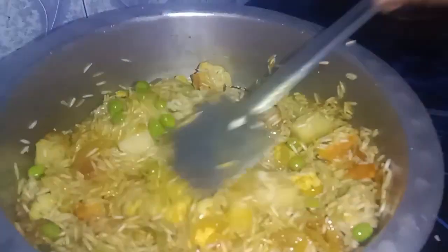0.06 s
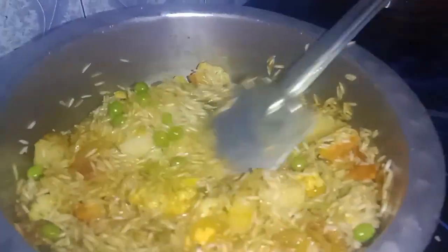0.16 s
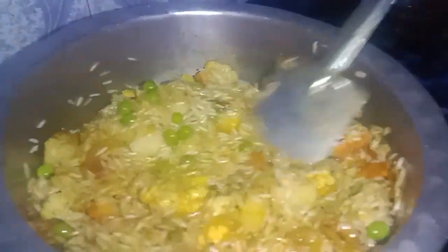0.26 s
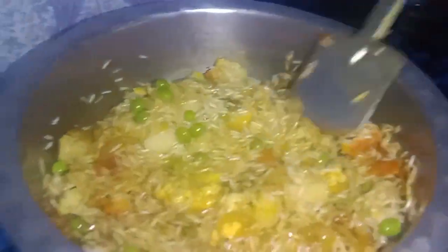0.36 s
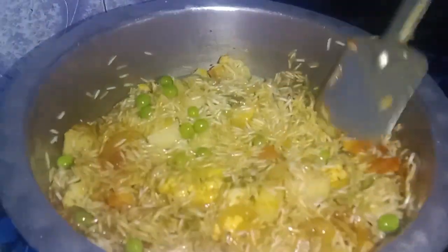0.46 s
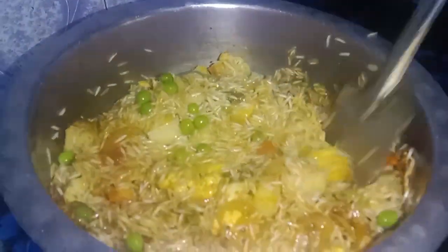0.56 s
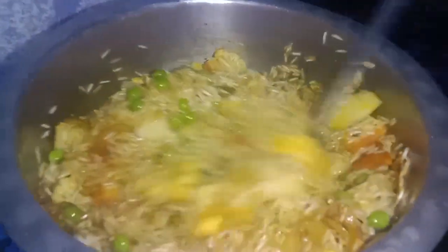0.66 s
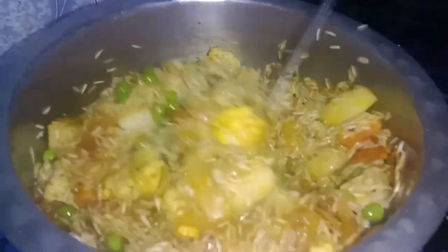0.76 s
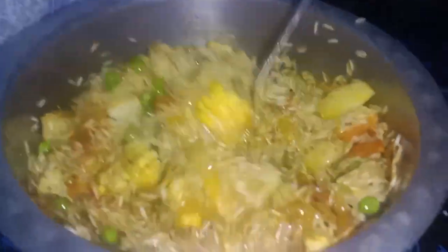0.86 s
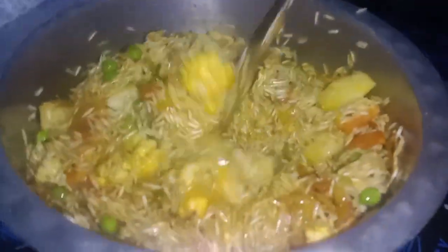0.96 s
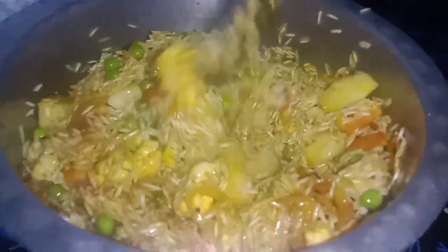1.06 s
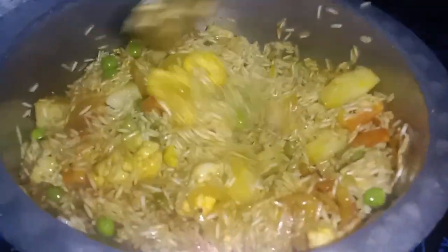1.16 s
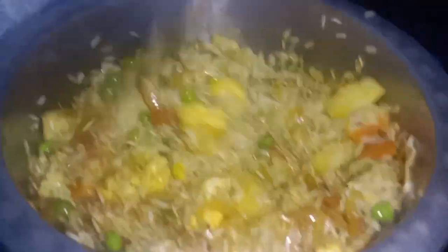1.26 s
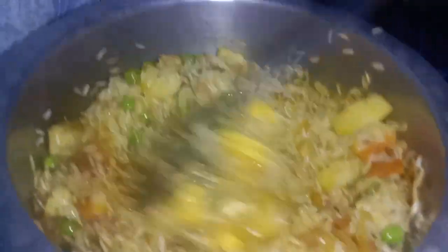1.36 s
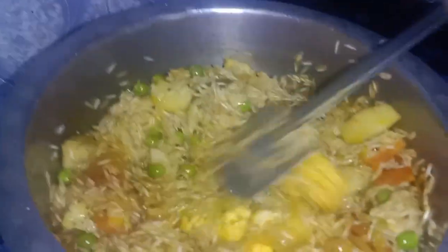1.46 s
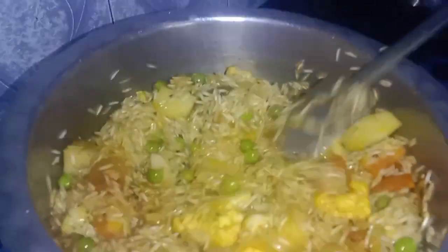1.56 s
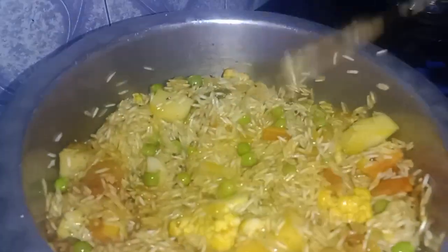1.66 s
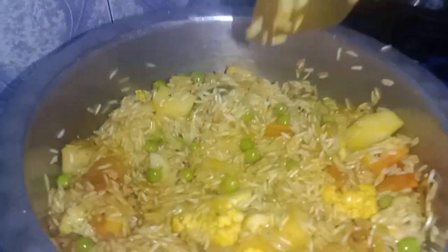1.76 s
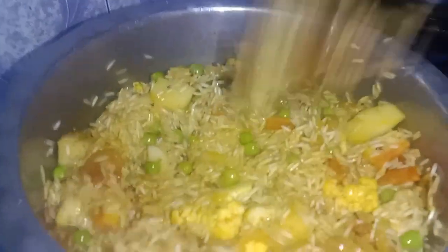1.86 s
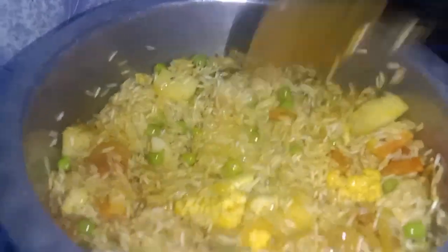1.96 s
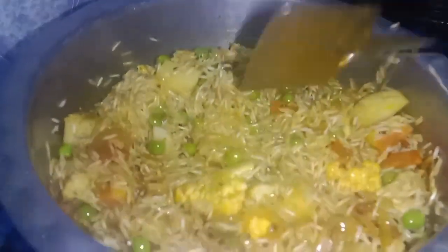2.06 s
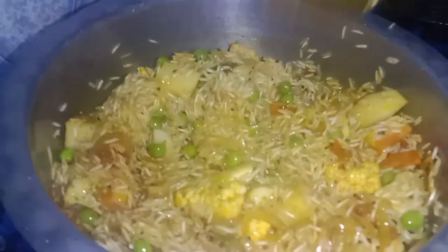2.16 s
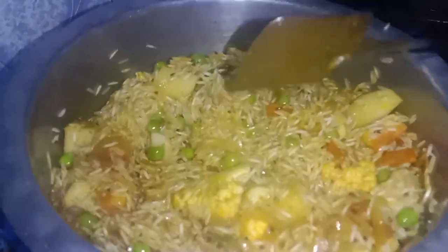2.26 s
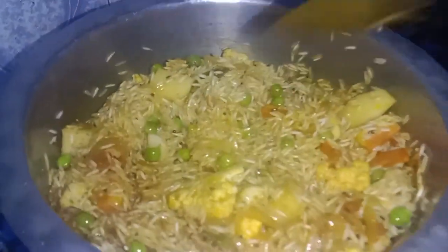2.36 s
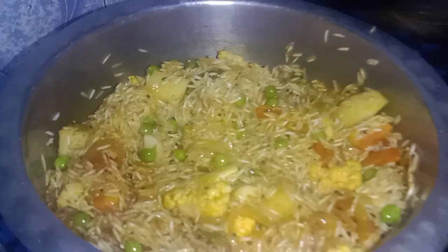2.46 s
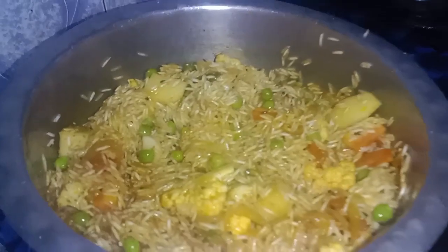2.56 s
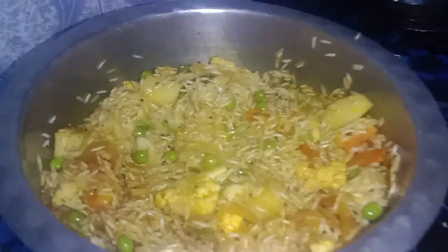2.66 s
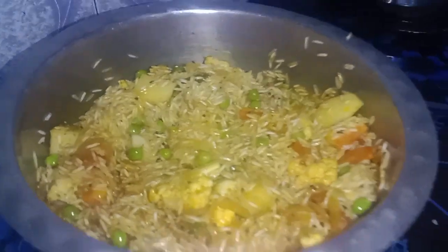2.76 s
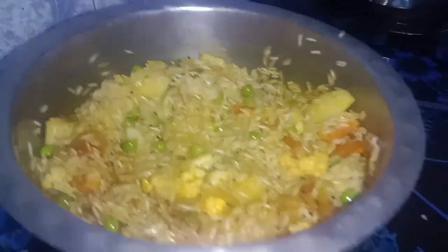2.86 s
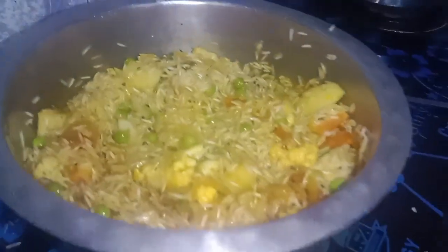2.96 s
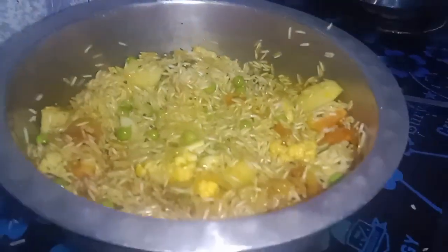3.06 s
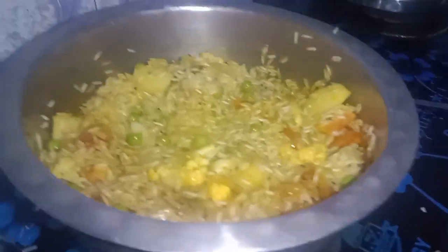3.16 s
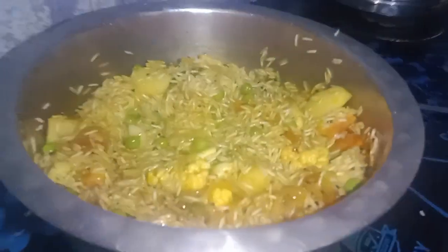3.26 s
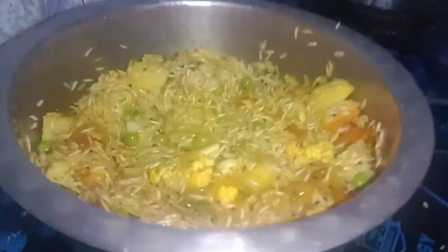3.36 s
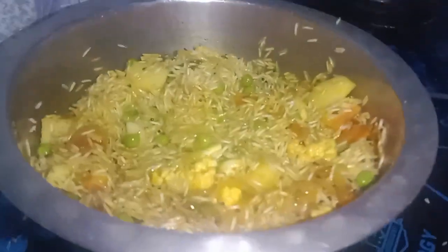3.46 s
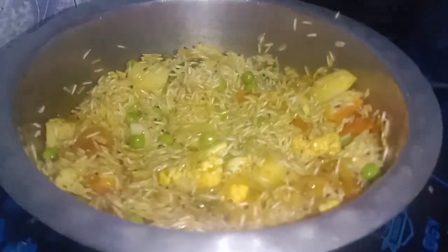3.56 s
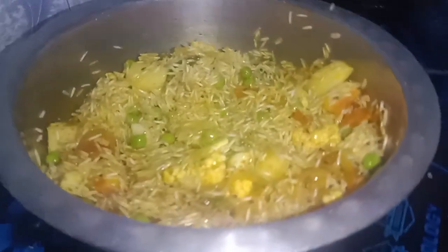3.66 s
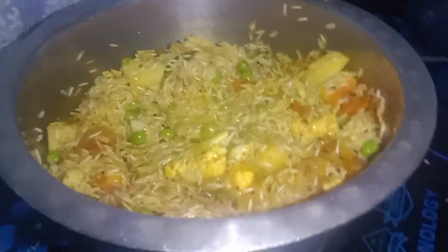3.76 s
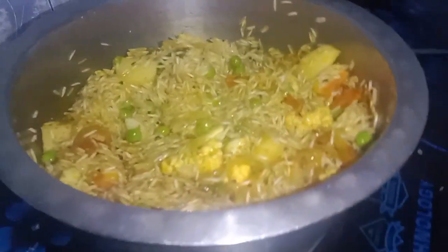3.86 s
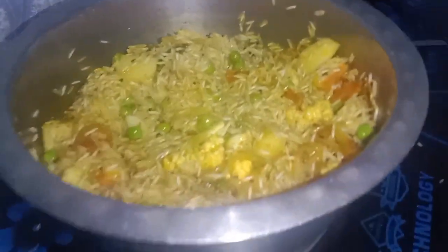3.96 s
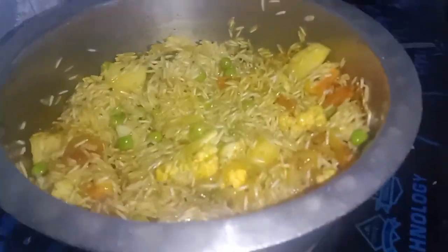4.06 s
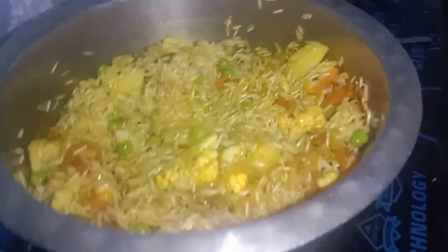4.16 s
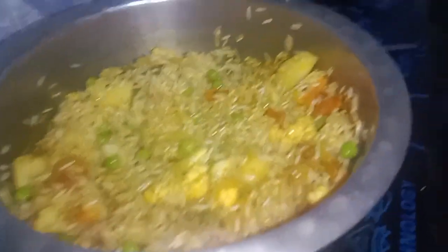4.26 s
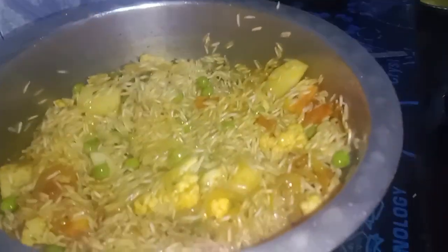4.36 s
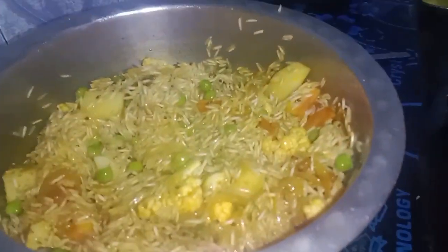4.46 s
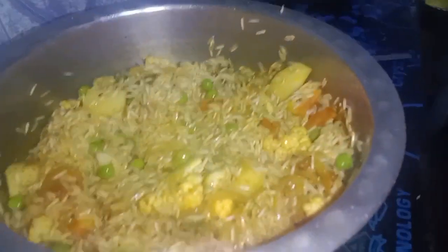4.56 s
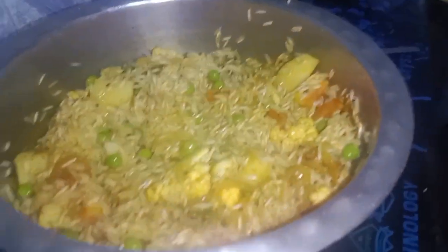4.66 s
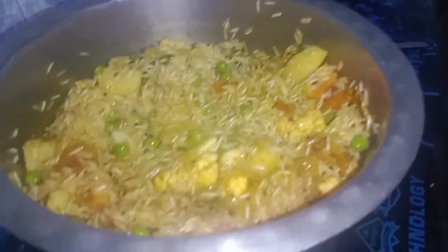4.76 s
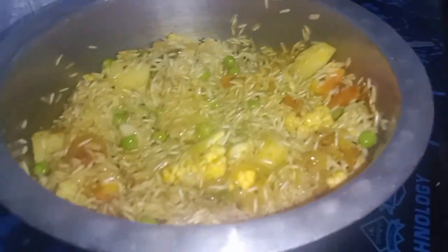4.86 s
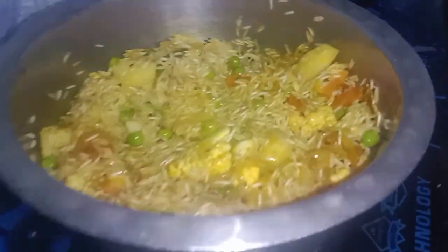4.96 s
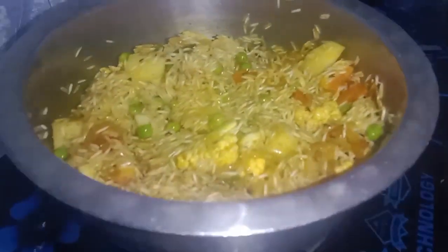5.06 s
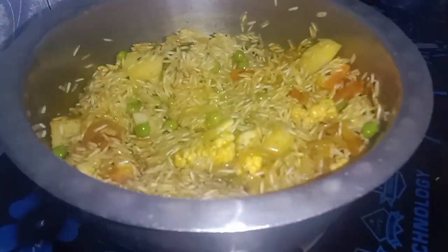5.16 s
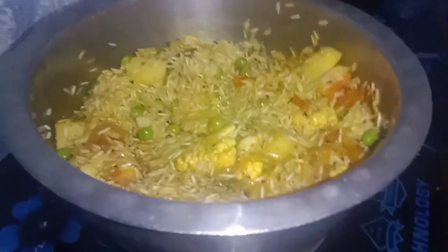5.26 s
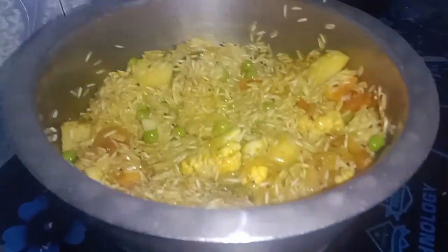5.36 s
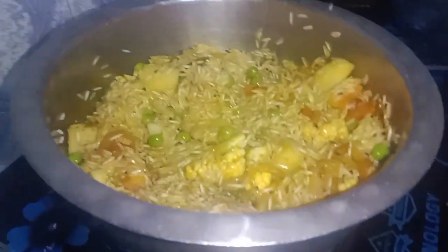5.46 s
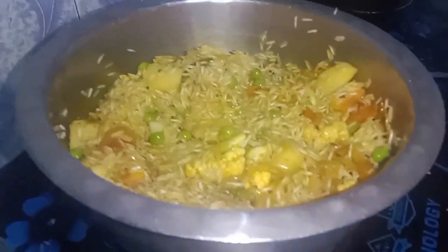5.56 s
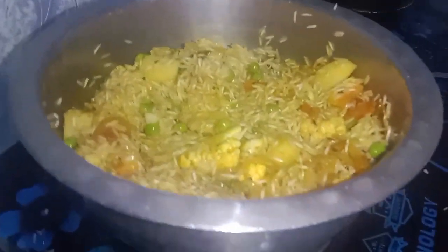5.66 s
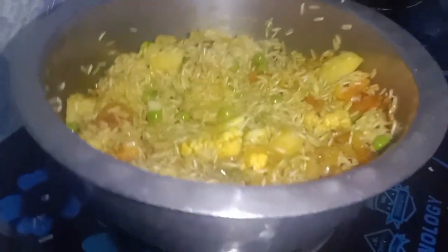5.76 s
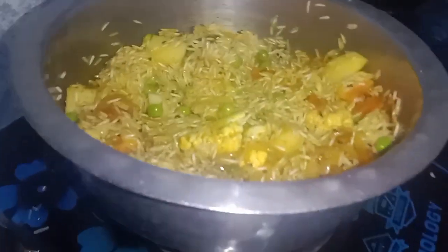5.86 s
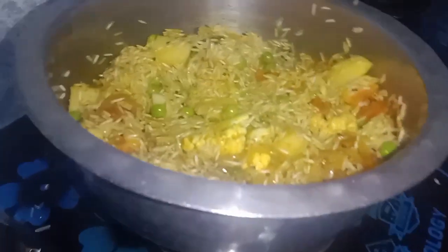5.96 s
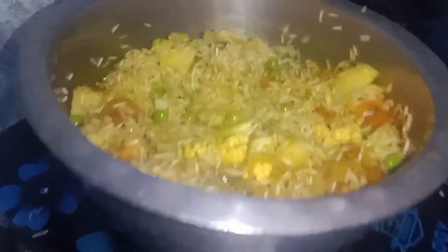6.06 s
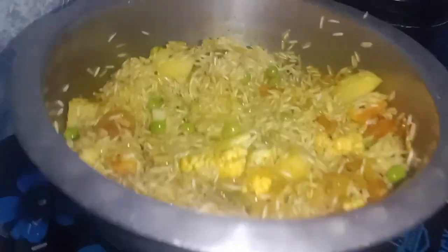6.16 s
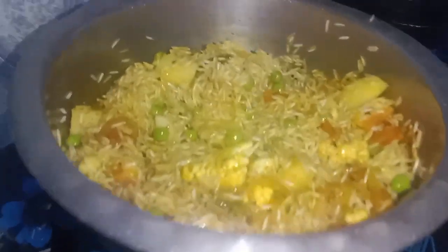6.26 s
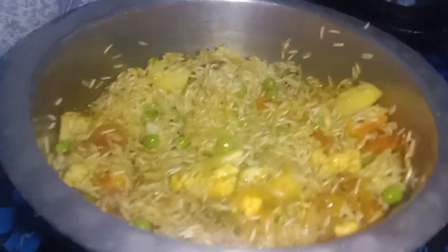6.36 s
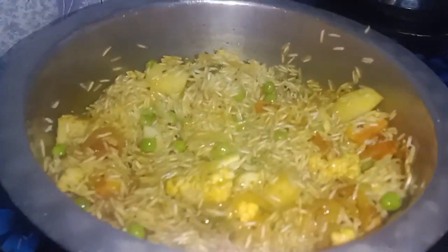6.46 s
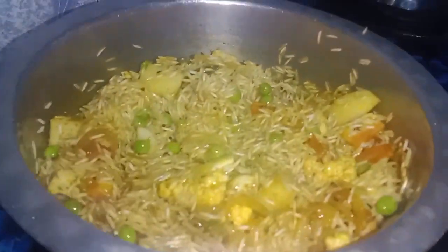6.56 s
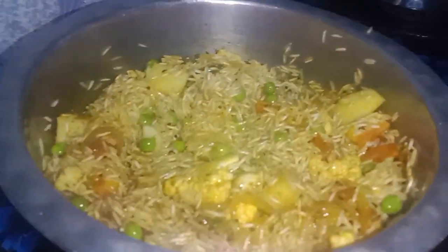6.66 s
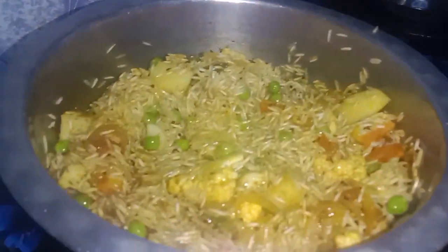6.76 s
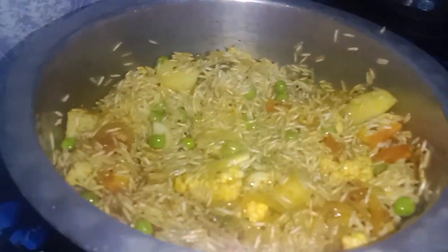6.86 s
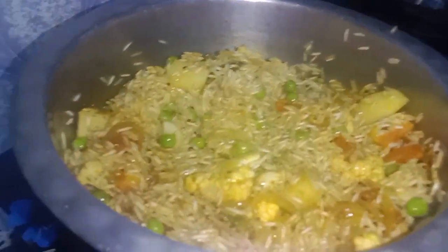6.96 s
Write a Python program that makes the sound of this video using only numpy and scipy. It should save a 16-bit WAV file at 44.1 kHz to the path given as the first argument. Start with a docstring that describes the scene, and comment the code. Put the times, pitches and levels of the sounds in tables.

```python
"""Rice and vegetables fry in a wide steel pot in a kitchen: random grains of noise make the sizzle.
A metal spoon, heard as struck and rubbed modes, turns the rice, hits the wall and squeaks on the steel.
It is knocked clean three times on the rim and put down with a clatter of steel modes and noise bursts.
The sizzle settles, faint narrow-band tones flicker under it, and grains of noise make a thin rustle nearby.
A limiter ducks the sound around the hardest knocks."""
import sys
import numpy as np
from scipy import signal
from scipy.fft import rfft, irfft
from scipy.io import wavfile
from scipy.ndimage import uniform_filter1d, minimum_filter1d

SR = 44100
rng = np.random.default_rng(int(sys.argv[2]) if len(sys.argv) > 2 else 0)


def waveform_to_disk(signal):
    """Save audio, clipped to [-1, 1], as 16-bit WAV at the path in sys.argv[1]."""
    frames = np.transpose(np.atleast_2d(signal))
    scaled = np.clip(frames, -1, 1) * 32767
    samples = np.round(scaled).astype(np.int16)
    wavfile.write(sys.argv[1], SR, samples)


N = 309141
TIME = np.arange(N) / SR   # seconds

# Room noise: hz, relative_db_per_hz
ROOM_COLOUR = [(18, -72.5), (30, -35.5), (60, 0), (247, -9), (413, -11), (679, -19.5), (918, -21),
               (1100, -26), (1430, -70.5), (2420, -120)]
ROOM_DB = -78
# Faint dull tones: middle_s, pitch_hz, level_db, length_s (between the points 1/e of the peak)
DULL_TONES = [(0.097, 507, -58, 0.093), (1.561, 222, -51, 0.042), (1.76, 600, -54, 0.035),
              (1.828, 301, -54.5, 0.17), (2.685, 537, -57.5, 0.075), (3.913, 910, -67, 0.1),
              (4.807, 414, -63.5, 0.11), (5.519, 510, -56.5, 0.051), (5.55, 619, -63, 0.051)]

# Vigour of the frying, sinking after the stir and creeping back as the bottom heats: time_s, level_db
FRYING_TREND = [(0, -33.5), (.72, -35.5), (1.2, -40.5), (2.0, -41), (3.7, -57.5), (5.4, -56), (6.1, -49.5),
                (7.0, -50.5)]
# Wet rice meets hot steel and the sizzle flares up: start_s, rise_db, fade_s (time constant)
FLARES = [(.118, 3.5, 0.26), (.285, 4.5, 0.054), (1.342, 4, 0.047), (1.41, 3, 0.046), (1.636, 5, 0.039),
          (4.295, 2.5, 0.13), (4.57, 2, 0.098), (4.89, 8.5, 0.12), (5.53, 6.5, 0.13)]
FLARE_ATTACK_S = 0.01
# Share of the rice that is freshly turned at the start, and the time constant of its settling
TURNED_SHARE, SETTLE_S = 0.92, 1.8
# Sizzle of freshly turned rice: hz, relative_db_per_hz
TURNED_COLOUR = [(650, -51), (1100, -35.5), (1240, -10.5), (1520, -18.5), (1640, -10.5), (2340, -12.5),
                 (3250, 0.5), (3800, -0.5), (4440, -16.5), (5420, -8), (7300, -3), (8810, -15.5),
                 (9520, -30.5), (15500, -31)]
# Sizzle of resting rice: hz, relative_db_per_hz
RESTING_COLOUR = [(530, -21.5), (900, -22), (1000, -31), (1180, -23.5), (1650, -18.5), (1770, -23.5),
                  (2250, -20.5), (2690, -6.5), (3540, 4), (3890, 2.5), (4390, -26.5), (5120, -6.5),
                  (7680, 2), (9510, -18), (15500, -25.5)]
# Single spits of oil: start_s, relative_db
SPITS = [(0.646, -40), (0.994, -36), (1.069, -19.5), (2.7293, -30.5), (4.304, -34.5), (4.609, -34.5),
         (4.8994, -31.5), (5.5648, -30), (5.5938, -34), (6.725, -30)]
# Faint narrow-band tones flicker under the sizzle, early on at this level relative to it
TONES_EARLY_DB = -19
# Later the tones grow steadily by themselves
TONES_FROM_S, TONES_START_DB, TONES_DB_PER_S = 3.91, -75.5, 3.5
# Pitches of the flickering tones: pitch_hz, relative_db, t60_s
FLICKER_MODES = [(1289, -10, 0.055), (1456, -10.5, 0.13), (1647, -4, 0.087), (1700, -3.5, 0.11),
                 (2240, -9.5, .08), (2658, 3, .08)]

# The spoon pushes through damp rice: start_s, length_s, level_db
PUSHES = [(.035, .18, -52), (.29, .13, -61), (1.595, .08, -59.5)]
PUSH_ATTACK_S, PUSH_T60_S = 0.011, 0.32
# The hollows that squelch in the rice: pitch_hz, relative_db, t60_s
SQUELCH_MODES = [(290, -5, 0.044), (480, -4, 0.17), (602, -0.5, .08), (707, -6, .07), (815, 0, 0.023),
                 (900, 6.5, 0.16), (1073, -9, 0.062), (1196, 10, 0.079)]
# The spoon drags along the bottom in jerks: start_s, length_s, level_db
DRAGS = [(.78, 0.039, -32.5), (.856, .03, -33.5), (.915, 0.037, -44)]
DRAG_ATTACK_S, DRAG_T60_S = 0.0068, 0.14
# The modes that groan under the drag: pitch_hz, relative_db, t60_s
SCRAPE_MODES = [(71.5, -26, .2), (164, -16, .12), (267, -13, 0.085), (275, -1.5, .1), (329, 10.5, 0.13),
                (413, 5.5, 0.073), (559, 1, 0.066), (703, 4.5, 0.053), (804, -3, .05)]

# Spoon on the pot, levels relative within each layer:
# start_s, rim_ring_db, judder_db, judder_length_s, tail_db, tail_t60_s, boom_db
KNOCKS = [(0.645, -32, -59, 0.0034, -61.5, 0.25, -67.5), (0.7784, -22.5, -26, 0.036, -23, 0.49, -58.5),
          (2.0189, 10, -26, 0.097, -23, .6, -32.5), (2.1972, 8.5, -25.5, 0.0895, -27.5, 0.62, -39.5),
          (2.3816, 10, -29, 0.094, -24, 0.64, -33.5)]
# The struck rim, a short clank and a weaker after-ring: pitch_hz, relative_db, t60_s
RIM_MODES = [(3412, -7, 0.033), (3500, -3.5, 0.014), (3773, -5, 0.029), (7000, -4.5, 0.02),
             (7560, 1.5, 0.0075), (3260, -40, 0.18), (3524, -53.5, 0.12), (3840, -42, 0.29),
             (7650, -47, 0.14)]
# Slow modes of the pot's wall and bottom: pitch_hz, relative_db, t60_s
POT_MODES = [(73, -6, 0.29), (119.7, -11.5, 0.26), (165.3, -3.5, 0.33), (229.4, -17, 0.14),
             (295.5, 1, 0.42), (424.7, 2, 0.18), (495, -12.5, .12), (670, -13, .15), (1094, -1, 0.11)]
# Noise of the struck pot wall: hz, relative_db_per_hz
POT_COLOUR = [(120, -60.5), (200, -15), (293, -3), (352, -15.5), (422, -1.5), (462, -7), (641, -5),
              (992, -8.5), (1070, -10), (2470, -9), (3420, 3), (4660, -15.5), (7350, -3.5), (9480, -23.5),
              (15500, -35.5)]
CRACK_DB = -10   # crack of a contact, set relative to the rim's ring
POT_STEADY_S = 2.677   # the pot stops shaking on the hob

# The spoon's edge squeaks on the steel: start_s, relative_db
SQUEAKS = [(1.035, -26.5), (1.05, -42)]
# Partials of the squeak: pitch_hz, relative_db, t60_s
SQUEAK_MODES = [(8380, 6.5, 0.046), (8660, -6, 0.24), (9850, -12, 0.12), (13100, -8, 0.19),
                (13100, -16, .08), (14400, -11, .04), (15400, -13, .05)]

# Spoon put down: start_s, relative_db, treble_db, worktop_thud_db
CLATTER = [(3.0554, -19.5, 0, -49), (3.0614, -22, 9.5, -42), (3.146, -16.5, 0, -58),
           (3.1567, -14, -4.5, -77), (3.1622, -20, 8.5, -47.5), (3.3121, -12, -13.5, -48),
           (3.321, -14.5, -7.5, -36), (3.331, -14, -7, -34), (3.395, -28.5, -1, -47.5),
           (5.4899, -39, 0, -57), (5.503, -42, -2, -47.5)]
# Ring of the spoon: pitch_hz, relative_db, t60_s
SPOON_MODES = [(1357, -24.5, 0.26), (1576, -18.5, 0.22), (2180, -16, 0.22), (2610, -8.5, 0.33),
               (2695, -0.5, 0.14), (2850, -1.5, 0.15), (3430, -9, 0.17), (3394, 6, 0.057),
               (3830, 1.5, 0.122), (5080, -9, 0.26), (6500, -11, 0.38), (6860, -1.5, 0.32), (7450, 0, 0.13),
               (8830, -9.5, 0.097), (8680, 0, 0.12), (9860, -4.5, 0.067)]
# Noise and lesser modes of the spoon: hz, relative_db_per_hz
SPOON_COLOUR = [(710, -78), (1200, -35.5), (2090, -14.5), (2160, -21), (2330, -18.5), (2570, -5), (3390, 1),
                (4770, -20), (5090, -11), (5670, -6.5), (8240, -3), (9270, -21.5), (15500, -24.5)]
# Thud of the worktop: hz, relative_db_per_hz
WORKTOP_COLOUR = [(200, -25), (400, -15), (560, 0.5), (780, -16.5), (920, -10.5), (1300, -12), (2200, 4.5),
                  (3000, -36)]

# Something thin is handled, with a few firmer squeezes: start_s, length_s, relative_db
RUSTLES = [(5.86, 0.79, -48.5), (6.075, 0.071, -46), (6.21, .04, -45), (6.29, 0.12, -43),
           (6.645, 0.05, -42.5)]
RUSTLE_ATTACK_S, RUSTLE_T60_S = 0.031, 0.14
# Sharper crinkles in the rustle: start_s, relative_db, t60_s
CRINKLES = [(5.852, -36.5, 0.095), (5.9, -38.5, 0.093), (5.969, -35, 0.12), (6.221, -43, 0.073),
            (6.549, -30, 0.015), (6.583, -29.5, 0.049)]
# Rustle: hz, relative_db_per_hz
RUSTLE_COLOUR = [(1180, -36), (2000, -44), (2350, -32), (3290, -5), (3800, -8), (4440, -27), (5180, -11.5),
                 (7170, 1), (8660, 1.5), (9430, -9.5), (11500, -14), (12700, -9), (13900, -21), (15500, -5)]

# Top of the band, and how early the limiter acts
CUTOFF_HZ, LOOK_AHEAD_S = 15700, 0.0105


def from_db(db):
    """Logarithmic level: decibels to amplitude gain."""
    return 10 ** (np.asarray(db) / 20)


def rms_one(x):
    """Normalisation: scale to unit rms."""
    return x / np.sqrt(np.mean(x ** 2) + 1e-20)


def in_time(rows):
    """Linear interpolation: join (time_s, value) rows by straight lines."""
    return np.interp(TIME, *np.transpose(rows))


def drift(per_s):
    """Slow random modulation: a wander of rms 1 through per_s random points a second."""
    return rms_one(np.interp(TIME * per_s, np.arange(4000), rng.standard_normal(4000)))


def strokes(rows, attack_s, t60):
    """Envelope of movements (start_s, length_s, level_db): each swells, holds and dies away."""
    gain = np.zeros(N)
    for s, length, db in rows:
        swell = np.clip((TIME - s) / attack_s, 0, 1)
        after_s = np.maximum(TIME - s - length, 0)
        gain += swell * from_db(db - 60 * after_s / t60)
    return gain


def add(track, s, sound):
    """Superposition: mix a sound into a track at time s."""
    start = round(s * SR)
    track[start:start + len(sound)] += sound[:N - start]


def coloured(x, spectrum, size=4096):
    """Minimum-phase (causal) filtering to the given spectrum; white noise keeps its power."""
    hz, db = np.transpose(spectrum)
    bins = np.maximum(np.fft.rfftfreq(size, 1 / SR), 1)
    log_gain = np.log(from_db(np.interp(np.log(bins), np.log(hz), db)))
    # folding the cepstrum onto positive times makes the response causal
    cepstrum = irfft(log_gain)
    cepstrum[1:size // 2] *= 2
    cepstrum[size // 2 + 1:] = 0
    response = irfft(np.exp(rfft(cepstrum)))[:size // 2]
    return signal.oaconvolve(x, response / np.linalg.norm(response))[:len(x)]


def dying(t60):
    """Exponential damping: one second of decay, falling 60 dB in t60."""
    return np.exp(-np.log(1000) * TIME[:SR] / max(t60, 1e-3))


def burst(t60):
    """High modal density: countless close modes and echoes dying together, as decaying noise."""
    return rng.standard_normal(SR) * dying(t60)


def ring(modes, spread_db):
    """Modal synthesis: one blow strikes each mode with a strength and sign of its own."""
    out = np.zeros(SR)
    for hz, db, t60 in modes:
        strength = from_db(db + spread_db * rng.standard_normal()) * rng.choice([-1, 1])
        out += strength * np.sin(2 * np.pi * hz * TIME[:SR]) * dying(t60)
    return out


def echoing(x, wet_db, t60):
    """Reverberation: dense reflections from the pot's wall and the kitchen follow the direct sound."""
    tail = burst(t60)
    return x + from_db(wet_db) * signal.oaconvolve(x, tail / np.linalg.norm(tail))[:N]


def grains(per_s, spread_db):
    """Shot noise: random tiny clicks, a few much bigger than the rest; rms 1."""
    sizes = from_db(spread_db * np.minimum(rng.exponential(1, N), 5))
    signs = rng.choice([-1, 1], N)
    return rms_one(sizes * signs * (rng.random(N) < per_s / SR))


def snaps(rows, tail_db, tail_t60):
    """Impulsive excitation: a short crack with a weak tail for each (start_s, level_db, t60_s) row."""
    out = np.zeros(N)
    for s, db, t60 in rows:
        add(out, s, from_db(db) * (burst(t60) + from_db(tail_db) * burst(tail_t60)))
    return out


def rung_at_random(modes, per_s, spread_db):
    """Resonance: each mode is rung by its own random run of small impulses; rms 1."""
    out = np.zeros(N)
    for hz, db, t60 in modes:
        radius = from_db(-60 / (t60 * SR))
        angle = 2 * np.pi * hz / SR
        poles = [1, -2 * radius * np.cos(angle), radius * radius]
        rung = signal.lfilter([1, 0, -1], poles, grains(per_s, spread_db) + 1e-18)
        out += from_db(db) * rms_one(rung)
    return rms_one(out)


def close_modes(spectrum, t60, count):
    """Modal density: lesser modes at random pitches, one row each; joint power 1 at the start."""
    hz, db = np.transpose(spectrum)
    pitches = np.linspace(1300, 15300, count) + rng.uniform(-90, 90, count)
    gains = from_db(np.interp(pitches, hz, db))
    gains *= np.sqrt(2) / np.linalg.norm(gains)
    return gains[:, None] * np.sin(2 * np.pi * pitches[:, None] * TIME[:SR]) * dying(t60)


def background():
    """Filtered noise and frequency modulation: a low room tone, and faint tones that swell and fade."""
    out = from_db(ROOM_DB) * coloured(rng.standard_normal(N), ROOM_COLOUR)
    for middle_s, hz, db, length in DULL_TONES:
        phase = 2 * np.pi * np.cumsum(hz * (1 + 0.0248 * drift(40))) / SR
        swell = np.exp(-(2 * (TIME - middle_s) / length) ** 2)
        out += from_db(db) * swell * np.sin(phase)
    return out


def vigour_db():
    """Heat transfer sets the frying level: a slow trend, and flares that jump up and fade."""
    level_db = in_time(FRYING_TREND)
    for s, rise_db, fade_s in FLARES:
        attack = np.clip((TIME - s) / FLARE_ATTACK_S, 0, 1)
        fade = np.exp(-np.maximum(TIME - s - FLARE_ATTACK_S, 0) / fade_s)
        level_db += rise_db * attack * fade
    return level_db


def flickering_tones(turned, level_db):
    """Narrow-band resonance: faint tones follow the sizzle early on and grow steadily later."""
    following = turned * from_db(level_db + TONES_EARLY_DB)
    later_s = TIME - TONES_FROM_S
    growing = np.clip(later_s / 0.36, 0, 1) * from_db(TONES_START_DB + TONES_DB_PER_S * later_s)
    flicker = from_db(3.9 * drift(10))
    tones = rung_at_random(FLICKER_MODES, per_s=24, spread_db=-0.5)
    return (following + growing) * flicker * tones


def sizzle():
    """Shot noise of steam bubbles bursting in the oil; turned rice sounds fuller than resting rice."""
    fizz = rms_one(grains(per_s=3500, spread_db=3.0) + from_db(-3.0) * rng.standard_normal(N))
    fizz = rms_one(echoing(fizz, wet_db=-8.5, t60=0.072))
    level_db = vigour_db()
    fizz = fizz * from_db(level_db + 0.46 * drift(30))
    spits = [(s, db, 0.012) for s, db in SPITS]
    fizz += from_db(-8) * snaps(spits, tail_db=-18.5, tail_t60=0.56)
    turned = np.clip(TURNED_SHARE * np.exp(-TIME / SETTLE_S), 0, 1)
    fresh = turned * coloured(fizz, TURNED_COLOUR)
    resting = (1 - turned) * coloured(fizz, RESTING_COLOUR)
    return fresh + resting + flickering_tones(turned, level_db)


def stirring():
    """Cavity resonance and stick-slip: the spoon ploughs through damp rice and jerks on the bottom."""
    push = strokes(PUSHES, PUSH_ATTACK_S, PUSH_T60_S)
    squelch = push * rung_at_random(SQUELCH_MODES, per_s=35, spread_db=5.5)
    drag = strokes(DRAGS, DRAG_ATTACK_S, DRAG_T60_S)
    scrape = drag * rung_at_random(SCRAPE_MODES, per_s=250, spread_db=3.0)
    return squelch + scrape


def knocks():
    """Impact on a shell: the rim clanks, the touching spoon judders, the whole pot shakes and rings."""
    rim, wall, shaking = np.zeros((3, N))
    for s, rim_db, judder_db, length, tail_db, tail_t60, boom_db in KNOCKS:
        add(rim, s, from_db(rim_db) * ring(RIM_MODES, spread_db=2.5))
        touching = np.clip((length - TIME[:SR]) / 0.0069, 0, 1)
        judder = from_db(judder_db) * touching * grains(per_s=5000, spread_db=3.0)[:SR]
        bright = coloured(burst(0.037), [(9000, 3.5), (13000, 11.0)])
        crack = from_db(rim_db + CRACK_DB) * bright
        add(wall, s, crack + judder + from_db(tail_db) * burst(tail_t60))
        add(shaking, s, from_db(boom_db - 2.0) * dying(0.91))
    moving = np.clip((POT_STEADY_S - TIME) / 0.11, 0, 1)
    boom = shaking * rung_at_random(POT_MODES, per_s=300, spread_db=3.5)
    # the rim's clank carries no bass
    rim = signal.sosfilt(signal.butter(2, 1500, "high", fs=SR, output="sos"), rim)
    return rim + moving * (boom + coloured(wall, POT_COLOUR))


def squeaks():
    """Frictional excitation: the spoon's edge slips on the steel and rings thinly."""
    out = np.zeros(N)
    for s, db in SQUEAKS:
        add(out, s, from_db(db - 2.0) * ring(SQUEAK_MODES, spread_db=1.0))
    return out


def clatter():
    """Repeated impact: bowl and handle bounce on the worktop; each contact picks its own mix of modes."""
    steel, thuds = np.zeros((2, N))
    lesser = close_modes(SPOON_COLOUR, t60=0.14, count=70)
    for s, db, treble_db, thud_db in CLATTER:
        noise = from_db(1.0) * burst(0.021) + from_db(-10.5) * burst(0.35)
        hit = coloured(noise, SPOON_COLOUR)
        hit += from_db(-6.5) * (rng.standard_normal(len(lesser)) @ lesser)
        hit += from_db(-11.5) * ring(SPOON_MODES, spread_db=2.5)
        # a treble tilt gives each contact its own brightness
        hit = coloured(hit, [(4200, 0), (6500, treble_db)]) * from_db(treble_db / 2)
        add(steel, s, from_db(db) * hit)
        add(thuds, s, from_db(thud_db) * burst(0.21))
    # so small a piece of steel radiates no bass
    steel = signal.sosfilt(signal.butter(6, 1150, "high", fs=SR, output="sos"), steel)
    return steel + coloured(thuds, WORKTOP_COLOUR)


def rustle():
    """Crackling noise: clumps of very fine crackles with a few sharper crinkles."""
    handling = strokes(RUSTLES, RUSTLE_ATTACK_S, RUSTLE_T60_S)
    crackle = grains(per_s=6000, spread_db=3.0) * handling * from_db(2.4 * drift(50))
    crackle += snaps(CRINKLES, tail_db=-33, tail_t60=0.1)
    return coloured(echoing(crackle, wet_db=-5.5, t60=0.13), RUSTLE_COLOUR)


def scene():
    """Superposition of all sources at one microphone above the pot."""
    pot = sizzle() + stirring() + knocks() + squeaks()
    return (background() + pot + clatter() + rustle())[None]


def limited(x, ceiling_db, release_db_per_s, ahead_s):
    """Look-ahead gain control: the gain drops just before a peak and recovers quickly."""
    over_db = np.maximum(20 * np.log10(np.abs(x) + 1e-9) - ceiling_db, 0)
    half = max(int(ahead_s * SR / 2), 1)
    # the greatest excess within the time ahead
    over_db = -minimum_filter1d(-over_db, 2 * half + 1, origin=-half)
    # a straight release in dB
    recovery_db = release_db_per_s * TIME
    over_db = np.maximum.accumulate(over_db + recovery_db) - recovery_db
    return x * from_db(-uniform_filter1d(over_db, size=48))


def record(dry):
    """Band limiting and gain control: the small microphone loses deep bass, knocks and top are held down."""
    out = signal.sosfilt(signal.butter(4, 62, "high", fs=SR, output="sos"), dry[0])
    out = limited(out, ceiling_db=-1.5, release_db_per_s=1595.5, ahead_s=LOOK_AHEAD_S)
    return signal.sosfilt(signal.ellip(10, 0.2, 70, CUTOFF_HZ, fs=SR, output="sos"), out)[None]


dry = scene()
out = record(dry)
waveform_to_disk(out)
```